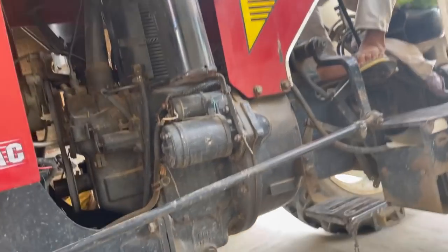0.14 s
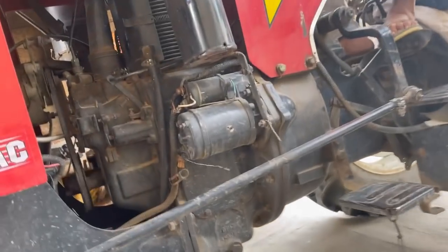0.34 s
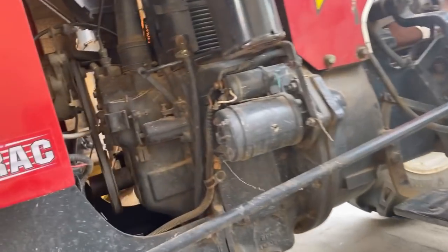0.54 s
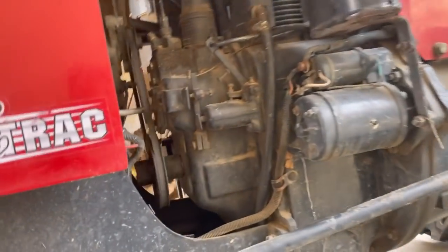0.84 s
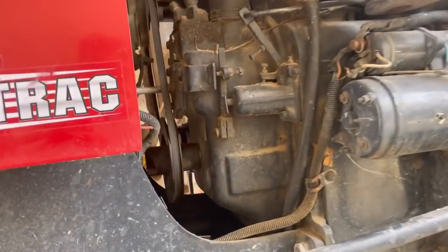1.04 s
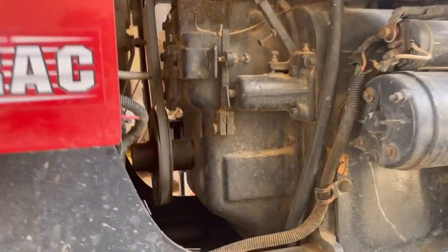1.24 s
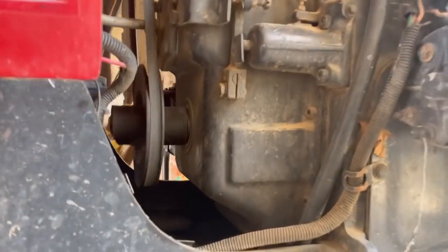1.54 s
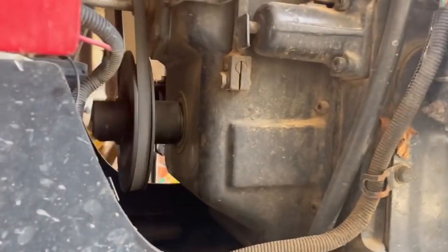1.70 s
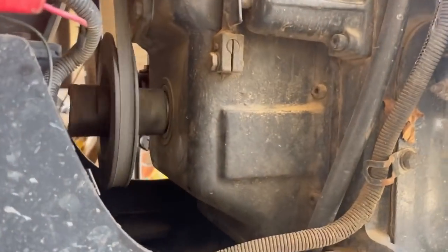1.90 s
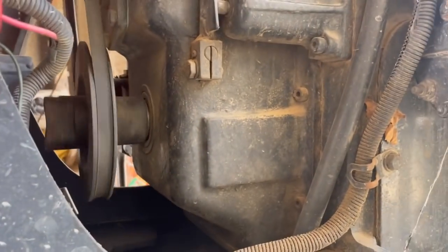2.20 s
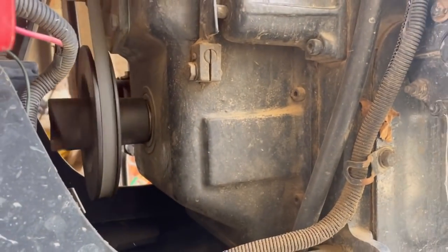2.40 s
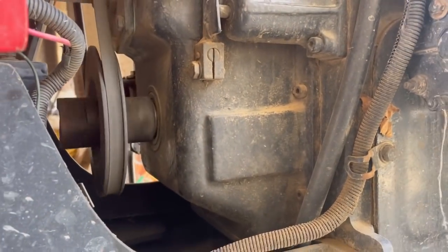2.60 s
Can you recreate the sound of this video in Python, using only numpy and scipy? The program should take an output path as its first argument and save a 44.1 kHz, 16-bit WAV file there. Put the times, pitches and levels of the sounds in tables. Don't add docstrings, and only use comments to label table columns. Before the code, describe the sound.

Close phone pickup of an idling diesel tractor outdoors. Gears and pistons clatter over gusting fan air, a loose part clunks then clanks, combustion knocks about seven times a second, and later two more clunk-clank pairs sound.

```python
import sys
import numpy as np
from scipy import signal
from scipy.fft import rfft, irfft
from scipy.io import wavfile
from scipy.ndimage import uniform_filter1d

SR = 44100
rng = np.random.default_rng(int(sys.argv[2]) if len(sys.argv) > 2 else 0)


def store_wav(level_fs):
    pcm = np.round(np.clip(np.atleast_2d(level_fs), -1, 1) * 32767)
    wavfile.write(sys.argv[1], SR, pcm.T.astype(np.int16))


def gain_from_decibels(decibels):
    exponent = np.asarray(decibels, float) / 20
    return 10 ** exponent


N = 121275
T = np.arange(N) / SR
HZ = np.fft.rfftfreq(N, 1 / SR)

# time_s, level_db
GUST = [(0.0, -28), (0.12, -32), (0.19, -18), (0.34, -20), (0.66, -28), (0.77, -24), (0.83, -30),
        (1.06, -21.5), (1.17, -27.5), (1.39, -21), (1.42, -30.5), (1.62, -20.5), (1.78, -30.5),
        (1.92, -17.5), (2.11, -28.5), (2.27, -20.5), (2.37, -27), (2.75, -29)]
# freq_hz, level_db
AIR = [(12, -40), (22, -29), (33, 4.5), (45, 5.5), (90, -4.5), (165, -3.5), (220, -16.5), (400, -15.5),
       (900, -79)]
# start_s, level_db, pitch_hz
THROBS = [(0.161, -20, 160.6), (0.304, -16, 96.5), (0.435, -13, 132), (0.634, -21, 145),
          (0.725, -14, 170.5), (0.829, -28, 131), (1.0, -15, 153.5), (1.216, -22, 108), (1.367, -22, 148),
          (1.68, -25, 143), (1.823, -17, 113), (1.914, -15.5, 169), (2.179, -20, 162), (2.451, -17, 142)]
# time_s, level_db
GEAR = [(0, -36), (.11, -32.5), (.3, -33), (.49, -29.5), (.6, -31.5), (.78, -26), (.855, -31), (.9, -26.5),
        (1.08, -27.5), (1.125, -30), (1.17, -27.5), (1.5, -27), (1.62, -27.5), (1.74, -29), (1.86, -28),
        (2.1, -30), (2.4, -30.5), (2.75, -30.5)]
# freq_hz, level_db
CLATTER = [(90, -44), (200, -2.5), (750, -5), (2600, -11.5), (5000, -18.5), (6300, -49), (12500, -67),
           (16500, -68)]
# freq_hz, width_hz, level_db
BLOCK = [(321, 33, -6), (463, 150, 4), (758, 124, 2), (1160, 6.1, 18.5), (1350, 70, -5.5), (1540, 81, 3.5),
         (1736, 10, 6.5), (1930, 18, 7.5), (2551, 18, 7.5), (3200, 28, -2.5), (3530, 53, -4.5),
         (2136, 27, -1)]
# start_s, level_db, pitch_hz
TICKS = [(0.0657, -61, 12800), (0.2598, -40.5, 12300), (0.3301, -34, 12600), (0.3865, -55, 9860),
         (0.524, -30, 11500), (0.5626, -42, 12100), (0.601, -31, 12100), (0.66, -30.5, 10600),
         (0.7074, -47, 11900), (0.7724, -34, 10200), (0.8031, -39, 12700), (0.841, -33, 12400),
         (0.8809, -35, 11800), (0.9433, -30.5, 12000), (0.9722, -45, 12700), (1.0475, -32, 11900),
         (1.0924, -40, 12200), (1.1338, -31, 11800), (1.1742, -33, 11400), (1.2396, -28.5, 12400),
         (1.3478, -29, 12500), (1.3957, -29.5, 12100), (1.4361, -30.5, 12100), (1.4805, -37, 11900),
         (1.55, -25, 11300), (1.6224, -36, 10900), (1.6596, -30, 12100), (1.71, -28.5, 11800),
         (1.753, -26, 12100), (1.7983, -34.5, 11700), (1.8342, -44, 13100), (2.0597, -38, 12000),
         (2.1355, -53, 12000), (2.303, -31, 11400), (2.378, -32, 12300), (2.4394, -32, 13400),
         (2.5172, -35, 12500), (2.581, -36, 10900), (2.6204, -39, 12100), (2.6584, -37, 13000),
         (2.7197, -33, 13400)]
# freq_hz, level_db
TICK_COLOUR = [(1000, -26), (2500, 9), (4000, -1), (7000, -4.5), (9000, 3), (12500, -8.5), (15000, -18),
               (16500, -38)]
# start_s, level_db, pitch_hz
SLAPS = [(0.0578, -40, 2370), (0.0934, -29, 2620), (0.3084, -28, 2450), (0.338, -21, 3170),
         (0.4404, -22.5, 4050), (0.4867, -20, 2740), (0.5414, -44, 2540), (0.5704, -28, 2410),
         (0.6, -21.5, 2665), (0.6694, -22, 2600), (0.701, -19.5, 2500), (0.771, -15, 3420),
         (0.8854, -15, 2480), (0.9472, -21, 3470), (1.0154, -20, 2460), (1.054, -26, 3580),
         (1.137, -23, 2600), (1.1692, -18, 2600), (1.2426, -23, 3760), (1.3135, -19.5, 2480),
         (1.366, -23.5, 2600), (1.464, -20, 4150), (1.4925, -17.5, 3480), (1.5509, -15.5, 3440),
         (1.6212, -15, 2580), (1.7185, -40, 2600), (1.7714, -15, 2600), (1.9066, -21, 2500),
         (2.0533, -23, 2510), (2.1266, -19, 3550), (2.35, -22, 2480), (2.379, -22, 2550),
         (2.439, -34, 3000), (2.4744, -34, 2520), (2.5155, -19, 2160), (2.6194, -20.5, 3890),
         (2.6696, -18, 2630), (2.7246, -21.5, 2120)]
# freq_hz, level_db
SLAP_COLOUR = [(700, -30), (1500, 5.5), (2600, -3), (4300, -1), (5600, -14.5), (8000, -27)]
# start_s, level_db, rattle_s, crack_db
CLUNKS = [
    (.1225, -18.5, 0.058, -34.5),
    (1.872, -11.5, 0.052, -23.5),
    (2.1655, -16, 0.065, -25.5),
]
# start_s, level_db, rattle_s, crack_db
CLANKS = [
    (.189, -25, 0.058, -32.5),
    (1.947, -16, 0.042, -21.5),
    (2.2345, -21, 0.051, -27),
]
# freq_hz, level_db, t60_s
CLUNK_MODES = [(292, -25.5, 0.13), (331, -4, 0.092), (431, -5.5, 0.025), (498, -6.5, 0.11),
               (592, -1, 0.052), (692, -3, .045), (825, 2.5, 0.022), (935, -1.5, 0.013), (1116, 2.5, 0.046),
               (1260, -6, 0.031), (1577, -1.5, 0.043), (1800, -9, 0.038), (2070, -17.5, 0.05),
               (3300, -20, .012)]
# freq_hz, level_db, t60_s
CLANK_MODES = [(1544, -15, 0.057), (1850, -6, 0.0093), (2067, 0, 0.017), (2443, 0, 0.037), (2610, -7, 0.02),
               (2890, -6.5, 0.05), (3550, -5, 0.014), (3720, -5, 0.029), (4600, -10, .012),
               (5040, -8.5, 0.03), (5970, -13, 0.0091), (6860, -5, 0.015)]
# start_s, level_db, first_mode_db (replaces level_db for the first casing mode)
KNOCKS = [(0.216, -20.5, -30.5), (0.353, -25, -35), (0.503, -23, -29), (0.636, -19.5, -26),
          (0.783, -14, -33.5), (0.923, -14.5, -23.5), (1.067, -17, -27.5), (1.214, -14.5, -22),
          (1.367, -19.5, -24), (1.521, -15, -22.5), (1.679, -12, -19.5), (1.839, -12.5, -20),
          (1.99, -22, -23.5), (2.136, -20, -28.5), (2.28, -17, -25), (2.415, -19, -24),
          (2.554, -16.5, -27.5), (2.695, -21.5, -23)]
# freq_hz, level_db, t60_s
CASING = [(260, 6, .09), (738, 0, .065), (1125, -14, .05), (160, -10, .08)]
# freq_hz, likeness_0_to_1
LIKE = [(60, .97), (130, .95), (290, .93), (640, .5), (1500, .15), (3100, .35), (6000, .5), (8000, .92),
        (15000, .86)]
# freq_hz, level_db
TILT = [(60, -1.5), (250, 3), (500, 0), (1000, 4), (2000, 1), (4000, 4), (7000, 4), (15000, -1)]
# freq_hz, phase_rad
LEAD = [(100, 0), (5200, .4), (6460, -.9), (7580, -2.6), (8800, -3.14), (9560, -3.6), (12500, -5.9),
        (13500, -6.28)]


def unit(x):
    return x / np.sqrt(np.mean(x ** 2))


def over_hz(table, hz):
    a = np.array(table, float)
    return np.interp(np.log(hz + 1), np.log(a[:, 0]), a[:, 1])


def over_time(table):
    a = np.array(table, float)
    return gain_from_decibels(np.interp(T, a[:, 0], a[:, 1]))


def walk(rate_hz):
    hold = int(SR / rate_hz)
    steps = np.repeat(rng.standard_normal(N // hold + 1), hold)
    slewed = uniform_filter1d(uniform_filter1d(steps, hold), hold)
    return unit(slewed[:N])


def band(x, hz, width_hz):
    return signal.lfilter(*signal.iirpeak(hz, hz / width_hz, fs=SR), x)


def highpass(x, hz):
    return signal.sosfilt(signal.butter(2, hz, "high", fs=SR, output="sos"), x)


def ring(x, hz, t60_s):
    pole = np.exp(2j * np.pi * hz / SR - np.log(1000) / (t60_s * SR))
    return signal.lfilter([1], [1, -pole], x).imag


def swell(u, rise_s, t60_s):
    return (1 - np.exp(-u / rise_s)) * gain_from_decibels(-60 * u / t60_s)


def banded(x, colour, flicker_db, rate_hz):
    spec = rfft(x) * gain_from_decibels(over_hz(colour, HZ))
    out = 0
    for octave in np.arange(np.log2(colour[0][0]), np.log2(colour[-1][0]) + .5, .5):
        share = np.clip(1 - 2 * np.abs(np.log2(HZ + 1) - octave), 0, 1)
        out = out + irfft(spec * share, N) * gain_from_decibels(flicker_db * walk(rate_hz))
    return unit(out)


def decays(starts_s, levels_db, decay_s, rise_s):
    x = np.zeros(N)
    x[[int(s * SR) for s in starts_s]] = gain_from_decibels(levels_db)
    for s in (rise_s, decay_s):
        x = signal.lfilter([1], [1, -np.exp(-1 / (s * SR))], x)
    return x / (rise_s * SR) * np.e


def grains(per_s, scatter_db):
    chance, sign, size = rng.random((3, N))
    clicks = (chance < per_s / SR) * np.sign(sign - .5)
    return clicks * gain_from_decibels(-scatter_db * np.log(size + 1e-9))


def fan_air():
    return banded(rng.standard_normal(N), AIR, 1.5, 8.3) * over_time(GUST)


def sizzle():
    x = rng.standard_normal(N)
    return banded(x * np.abs(x) ** 1.2, TICK_COLOUR, 2.6, 40)


def jingle(noise):
    return noise * gain_from_decibels(-49 + 5.0 * walk(30.83))


def throbs():
    out, u = np.zeros(N + SR), T[:SR // 3]
    shape = swell(u, rise_s=.01, t60_s=.22)
    for s, db, hz in THROBS:
        out[int(s * SR):][:len(u)] += gain_from_decibels(db - 2.5) * shape * np.sin(2 * np.pi * hz * u)
    return out[:N]


def pings():
    per_s, low_hz, high_hz, t60_s = 200, 900, 4500, .05
    tilt_db_per_octave, scatter_db = -4.5, 4.0
    out, u = np.zeros(N + SR), T[:SR // 10]
    for when, pitch, size, ringing in rng.random((int(per_s * N / SR), 4)):
        hz = low_hz * (high_hz / low_hz) ** pitch
        db = tilt_db_per_octave * np.log2(hz / low_hz) + scatter_db * (2 * size - 1)
        shape = gain_from_decibels(db) * swell(u, .002, t60_s * (.5 + ringing))
        out[int(when * N):][:len(u)] += shape * np.sin(2 * np.pi * hz * u)
    return unit(out[:N])


def firing_beat():
    firings_per_cycle, depth, decay_firings, scatter_db = 3, .4, .35, 1.0
    times = np.array(KNOCKS)[:, 0]
    times = np.r_[2 * times[0] - times[1], times, 2 * times[-1] - times[-2]]
    phase = np.interp(T, times, np.arange(len(times))) * firings_per_cycle
    size = gain_from_decibels(scatter_db * rng.standard_normal(N // 100))[phase.astype(int)]
    return 1 + depth * size * np.exp(-(phase % 1) / decay_firings)


def clatter():
    hits = unit(grains(per_s=3000, scatter_db=2.0)) + rng.standard_normal(N)
    hits = hits * firing_beat()
    body = 0
    for hz, width_hz, db in BLOCK:
        body = body + gain_from_decibels(db + 4 * walk(12.2)) * band(hits, hz, width_hz)
    x = banded(hits, CLATTER, 1.8, 20) + gain_from_decibels(-5) * unit(body) + gain_from_decibels(-6) * pings()
    return unit(x) * over_time(GEAR) * gain_from_decibels(5.0 + .5 * walk(16))


def taps(rows, noise, decay_s, ring_db, width_hz, rise_s):
    starts_s, levels_db, _ = np.transpose(rows)
    out = noise * decays(starts_s, levels_db, decay_s, rise_s)
    white = rng.standard_normal(N)
    ring_gain = gain_from_decibels(ring_db) * np.sqrt(SR / (np.pi * width_hz))
    for s, db, hz in rows:
        at = slice(int(s * SR), int(s * SR) + SR // 8)
        burst = white[at] * decays([s], [db], decay_s, rise_s)[at]
        out[at] += band(burst, hz, width_hz) * ring_gain
    return out


def valve_ticks(noise):
    return gain_from_decibels(-8.5) * taps(TICKS, noise, decay_s=.012, ring_db=-12.5, width_hz=140, rise_s=.002)


def slaps():
    scrape = banded(rng.standard_normal(N), SLAP_COLOUR, 1.5, 40)
    return gain_from_decibels(-13.5) * taps(SLAPS, scrape, decay_s=.023, ring_db=-6, width_hz=42, rise_s=.005)


def loose_part(rows, modes, noise, contact_hz):
    chatter_hz, dulling, mode_spread = 400, .43, .012
    first_blow, first_blow_s = 1.6, .0025
    edge = gain_from_decibels(5.5) * band(noise, 13550, 3900)
    cracks = decays([r[0] for r in rows], [r[3] for r in rows], decay_s=.009, rise_s=.004)
    out, u = (noise + edge) * cracks, T[:SR // 4]
    hits = signal.lfilter(*signal.butter(1, contact_hz, fs=SR), grains(per_s=1500, scatter_db=2.0))
    chance = rng.standard_normal((len(rows), len(modes)))
    blow = first_blow * u / first_blow_s * np.exp(-u / first_blow_s)
    for (s, db, rattle_s, _), detunes in zip(rows, chance):
        at, x = slice(int(s * SR), int(s * SR) + len(u)), 0
        for (hz, mode_db, t60_s), detune in zip(modes, detunes):
            lasting_s = rattle_s * min(1, max(chatter_hz, modes[0][0]) / hz) ** dulling
            force = hits[at] * (np.exp(-(u / lasting_s) ** 2) + blow)
            x = x + gain_from_decibels(mode_db) * ring(force, hz * (1 + mode_spread * detune), t60_s)
        x = highpass(x, 236)
        out[at] += gain_from_decibels(db) * x / np.sqrt(np.mean(x[u < rattle_s] ** 2))
    return out


def knocks():
    out, u = np.zeros(N + SR), T[:SR // 4]
    chance = rng.standard_normal((len(KNOCKS), len(CASING)))
    for (s, db, low_db), detunes in zip(KNOCKS, chance):
        for (hz, mode_db, t60_s), detune in zip(CASING, detunes):
            level_db = (low_db if hz == CASING[0][0] else db) + mode_db + 6
            tone = np.sin(2 * np.pi * hz * (1 + .013 * detune) * u)
            out[int(s * SR):][:len(u)] += gain_from_decibels(level_db) * swell(u, .0051, t60_s) * tone
    return out[:N]


def two_ports(x):
    like = np.clip(over_hz(LIKE, HZ), 0, 1)
    scatter = rng.standard_normal(N) * np.exp(-T / .034)
    scatter = rfft(scatter / np.sqrt(np.sum(scatter ** 2)))
    spec, out = rfft(x), []
    for side in (1, -1):
        port = np.sqrt((1 + like) / 2) + side * np.sqrt((1 - like) / 2) * scatter
        port = port * gain_from_decibels(side * over_hz(TILT, HZ) / 2)
        port = port * np.exp(.5j * side * over_hz(LEAD, HZ))
        out.append(irfft(spec * port, N))
    return np.array(out)


def scene():
    noise = sizzle()
    x = fan_air() + jingle(noise) + throbs() + clatter()
    x = x + valve_ticks(noise) + slaps()
    x = x + loose_part(CLUNKS, CLUNK_MODES, noise, contact_hz=2500)
    x = x + loose_part(CLANKS, CLANK_MODES, noise, contact_hz=9000)
    x = x + knocks()
    return two_ports(x)


def band_limit(x):
    return signal.sosfilt(signal.butter(12, 16050, fs=SR, output="sos"), x)


def record(dry):
    mix = np.tanh(highpass(dry, 47))
    return band_limit(mix)


dry = scene()
out = record(dry)
store_wav(out)
```